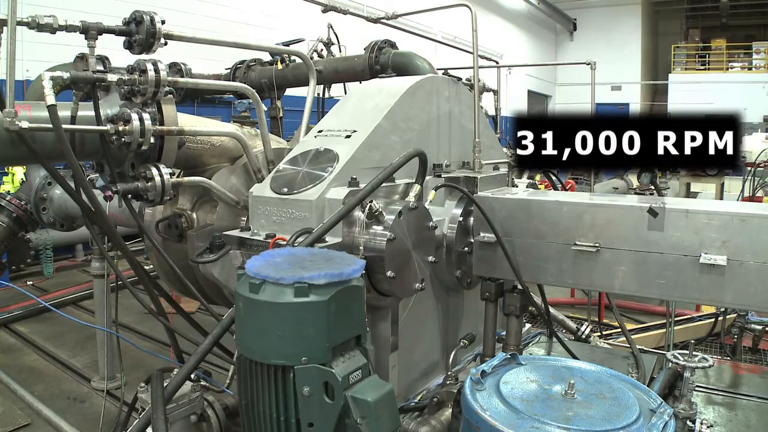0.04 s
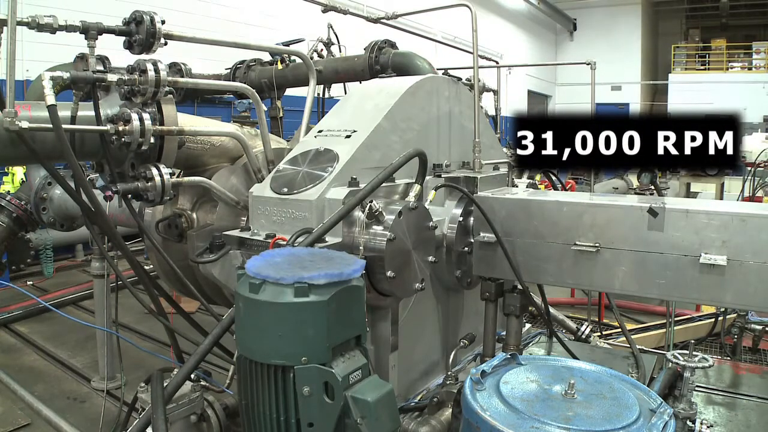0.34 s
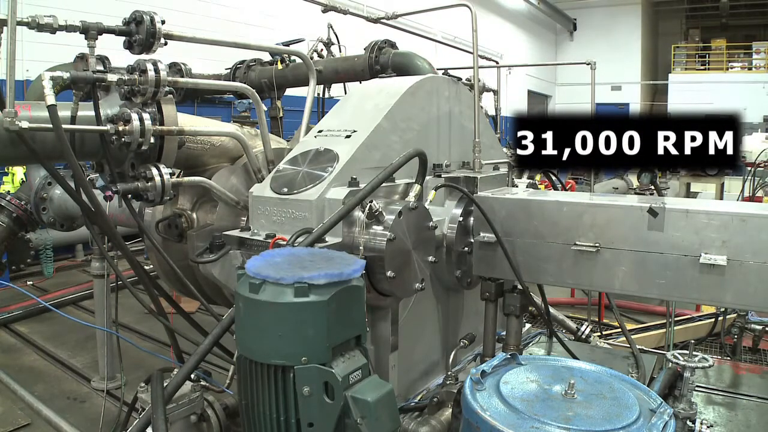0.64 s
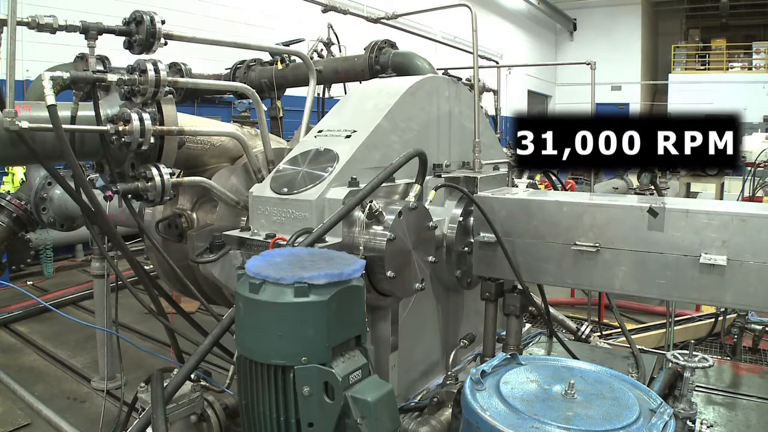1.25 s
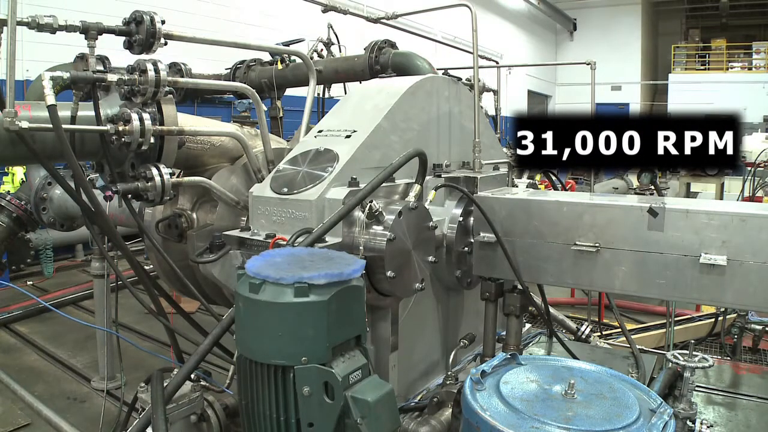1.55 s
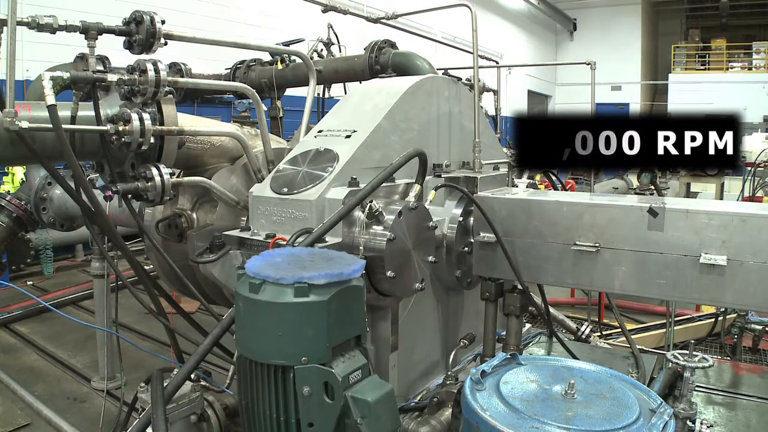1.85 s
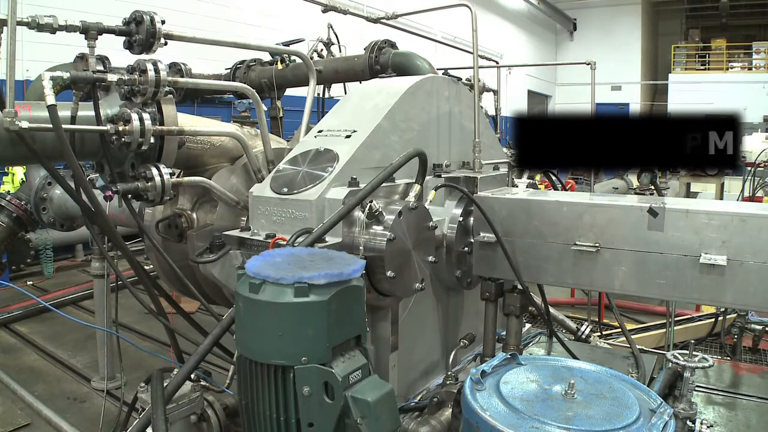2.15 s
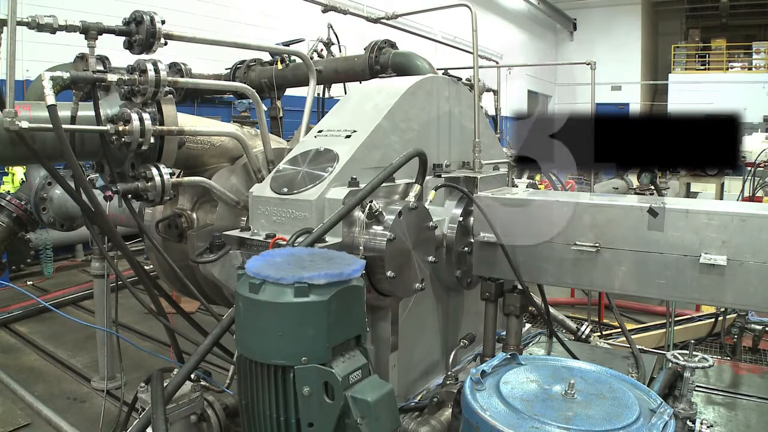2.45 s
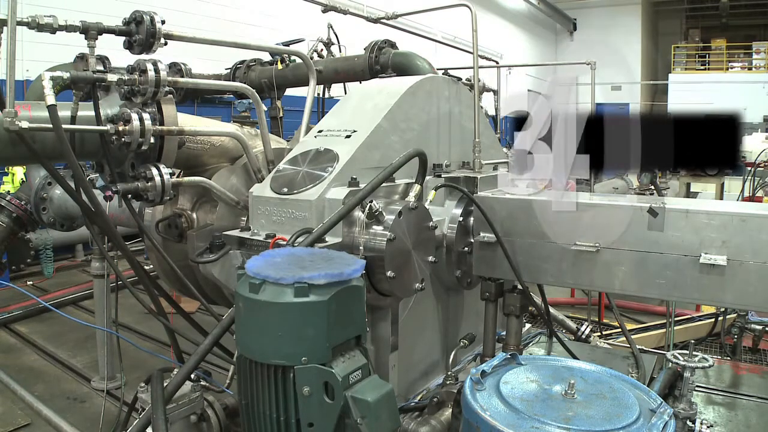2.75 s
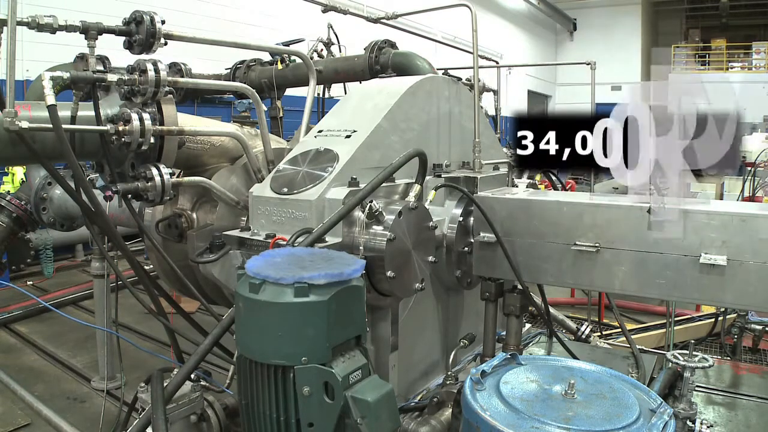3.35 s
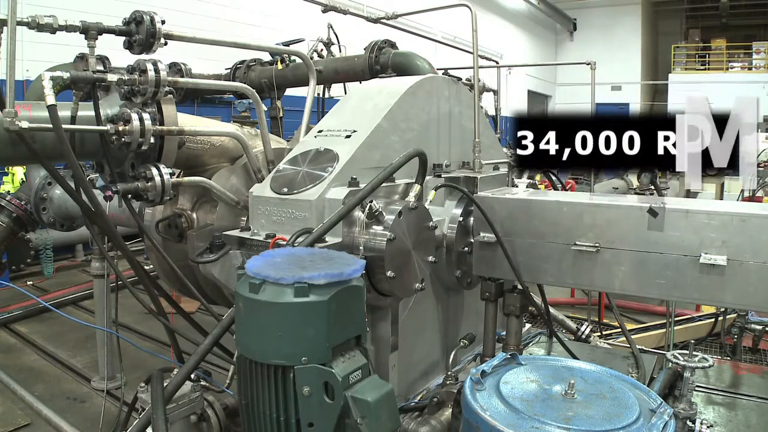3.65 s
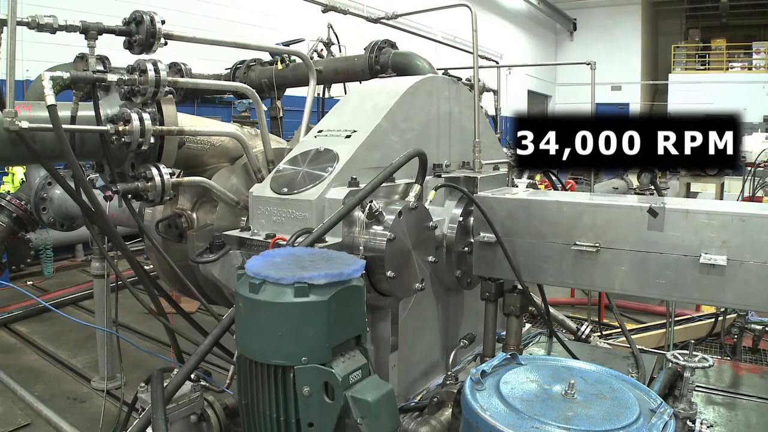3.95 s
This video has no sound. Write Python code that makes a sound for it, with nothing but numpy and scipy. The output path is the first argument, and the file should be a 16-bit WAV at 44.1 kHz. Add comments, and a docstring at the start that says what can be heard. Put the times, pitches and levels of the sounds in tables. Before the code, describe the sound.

A large industrial compressor runs in a plant hall for the whole four seconds, with a strong low hum, a rumble and a dense roar of gas. Several whining gear tones waver above it, under a faint hiss. A high fluttering whine swells around 1.7 seconds, again near 3.4 and at the end. A very faint, thin whistle comes and goes at about 1.5 seconds.

```python
"""A low hum and a roar of gas come first, with whining tones above: a large geared turbo compressor
runs in a plant hall, creeping up in speed. Its drive hums, its shafts and meshing gear teeth sing,
and two close high tones beat against each other. Gas rushes through casing and pipes over a low
rumble, and a faint hiss wavers on top. About 1.5 seconds in, a thin whistle briefly appears."""
import sys
import numpy as np
from scipy import signal
from scipy.fft import rfft, irfft
from scipy.io import wavfile
from scipy.ndimage import uniform_filter1d

SR = 44100
rng = np.random.default_rng(int(sys.argv[2]) if len(sys.argv) > 2 else 0)


def persist_wave(psi):
    """Save psi, clipped to +-1, as 16-bit WAV."""
    counts = np.round(np.clip(psi, -1, 1) * 32767).astype(np.int16)
    wavfile.write(sys.argv[1], SR, np.atleast_2d(counts).T)


N = 176400  # 4 seconds


def gain(db):
    """Turn decibels into a number to multiply a sound by."""
    return 10 ** (np.asarray(db) / 20)


def unit_strength(x):
    """Scale a signal so that its typical size (rms) is 1."""
    return x / np.sqrt(np.mean(abs(x) ** 2) + 1e-20)


def over_time(points):
    """Join a table's points with straight lines, one value per sample."""
    return np.interp(np.arange(N) / SR, *np.transpose(points))


def over_pitch(points, hz):
    """Join a table's points with straight lines along a musical (log) pitch scale."""
    table_hz, level = np.transpose(points)
    return np.interp(np.log(hz + 1), np.log(table_hz + 1), level)


def drift(rate_hz):
    """A random wander of typical size 1, mostly slower than rate_hz."""
    hz = np.fft.rfftfreq(N, 1 / SR)
    spectrum = rfft(rng.standard_normal(N)) * (hz > 0)
    return unit_strength(irfft(spectrum / (1 + (hz / rate_hz) ** 4), N))


def patches(shape, frames, bins):
    """Random blotches of typical size 1, smoothed over time (frames) and pitch (bins)."""
    smooth_in_time = uniform_filter1d(rng.standard_normal(shape), frames, axis=1)
    return unit_strength(uniform_filter1d(smooth_in_time, bins, axis=0))


# How fast the shaft turns (time [s], speed above average [%])
SHAFT_SPEED = [(0, -.3), (1, -.17), (2, .05), (3.2, .1), (4, .24)]

def tone(hz, level_db, shake, shake_hz=7, geared=True):
    """One machine tone, shaken by swirling gas; a geared tone rises with the shaft speed."""
    speed = 1 + over_time(SHAFT_SPEED) / 100 * geared
    cycles = np.cumsum(hz * speed) / SR + rng.random()
    wobble = (drift(shake_hz) + 1j * drift(shake_hz)) / np.sqrt(2)  # shakes both level and pitch
    wave = np.exp(2j * np.pi * cycles) * (1 + shake * wobble) / np.sqrt(1 + shake ** 2)
    return np.sqrt(2) * gain(level_db) * wave.real


# How loud the hum is (time [s], level [dB])
HUM_LEVEL = [(0, -21.5), (.8, -19), (1.4, -18.5), (2.4, -16.8), (3, -17.5), (4, -16.5)]

def drive_hum():
    """The drive hums with one strong, low tone."""
    return tone(hz=159.9, level_db=over_time(HUM_LEVEL), shake=.13)


# The gas noise from low to high (pitch [Hz], base level [dB per Hz])
GAS_SPECTRUM = [(12,-66),(22,-56),(35,-42.5),(60,-41.5),(110,-44),(135,-47.5),(185,-49.5),(215,-53.5),(330,-51.5),(440,-54.5),(690,-55),(745,-59),(850,-56),(1000,-61),(1110,-55.5),(1220,-61.5),(1500,-60.5),(1630,-53),(1740,-60),(1860,-62.5),(2150,-61.5),(2650,-58),(2900,-65.5),(3050,-61.5),(3170,-71.5),(3300,-66),(3480,-66),(3700,-72.5),(4200,-77.5),(4400,-89),(4650,-94),(4850,-112)]
# How the deep rumble and the roar above it swell and sink (time [s], level change [dB])
RUMBLE_SWELL = [(0, 0), (0.3, -1), (0.55, 1), (0.85, 2), (1.1, 1), (1.33, 1), (1.6, 0), (2.1, -1),
                (2.45, -4), (2.7, 0), (3.1, 1), (3.35, 0), (3.65, 1), (3.92, 2)]
ROAR_SWELL = [(0, -1.6), (1.5, -1.5), (3.3, -1), (4, -1.4)]

def gas_roar(rumble_top_hz=117):
    """Gas swirls through casing and pipes, making an even roar over a lumpy rumble."""
    hz = np.fft.rfftfreq(N, 1 / SR)
    flow = rfft(rng.standard_normal(N)) * gain(over_pitch(GAS_SPECTRUM, hz)) * np.sqrt(SR / 2)
    low_share = 1 / (1 + (hz / rumble_top_hz) ** 6)
    rumble = irfft(flow * low_share, N) * gain(over_time(RUMBLE_SWELL) + drift(10))
    roar = irfft(flow * (1 - low_share), N) * gain(over_time(ROAR_SWELL) + .3 * drift(35))
    return rumble + roar


# How loud each clear gear tone is (time [s], level [dB])
LOW_GEAR_LEVEL = [(0, -40), (0.6, -37.5), (1.15, -31.5), (1.45, -38.5), (1.8, -38), (2.15, -37),
                  (2.4, -29.5), (3.2, -34.5), (4, -37)]
MID_GEAR_LEVEL = [(0, -34.5), (0.7, -32.5), (1.05, -32.5), (1.35, -34), (1.8, -26.5), (2.2, -33.5),
                  (2.6, -31), (3.1, -28), (3.8, -41), (4, -33)]
HIGH_GEAR_LEVEL = [(0, -62), (.8, -50), (1.25, -44.5), (1.42, -49.5), (2.25, -43.5), (2.7, -46.5),
                   (3.3, -45), (3.55, -53), (3.64, -40.5), (3.79, -42), (3.84, -56), (4, -40)]

def gear_tones():
    """Gear teeth meet so quickly that they sing, here in three clear tones."""
    low = tone(hz=1263, level_db=over_time(LOW_GEAR_LEVEL), shake=.11)
    mid = tone(hz=1621.3, level_db=over_time(MID_GEAR_LEVEL), shake=.2)
    high = tone(hz=3911, level_db=over_time(HIGH_GEAR_LEVEL), shake=.33)
    return low + mid + high


# How loud each clear shaft tone is (time [s], level [dB])
LOW_SHAFT_LEVEL = [(0, -39), (.9, -38), (1.2, -35.5), (1.5, -32.5), (1.73, -38.5), (2.35, -33),
                   (2.6, -38.5), (3.55, -31.5), (4, -37)]
HIGH_SHAFT_LEVEL = [(0, -39), (.95, -35), (1.5, -42), (1.8, -35.5), (2.4, -33.5), (3.2, -35), (3.8, -33),
                    (4, -34)]

def shaft_tones():
    """The spinning shafts add two clear tones."""
    low = tone(hz=707.3, level_db=over_time(LOW_SHAFT_LEVEL), shake=.3)
    high = tone(hz=1143.3, level_db=over_time(HIGH_SHAFT_LEVEL), shake=.25)
    return low + high


# Quieter shaft and gear tones (pitch at average speed [Hz], base level halfway [dB], rise [dB per s])
WEAK_TONES = [(107.3, -30.1, -0.4), (190, -35.3, 0.5), (240, -42.4, 0.9), (319.8, -36.2, -2.7),
              (357, -38.3, 0.2), (506.7, -43.4, 0.5), (530.6, -40.5, 0.1), (599.3, -42.5, 0.4),
              (666.3, -42.5, 1.1), (861, -47.4, -0.4), (962, -44.8, 2.1), (1331, -47.2, 1.2),
              (1389, -47.2, -0.5), (1441.5, -44.4, 2.0), (1470, -47.4, -3.3), (1503, -46.6, 0.3),
              (1568, -43.4, -1.5), (1643, -40.0, 1.4), (1659, -42.4, -0.2), (1775, -46.9, -0.1),
              (2085, -49.4, 2.2), (2655, -47.2, 0.8), (3109, -52.3, -1.9), (3269, -49.8, 0.5),
              (3655, -57.1, -6.2)]

def weak_tones(boost_db=.5, fade_db=2):
    """Shafts and gears also make many weaker tones, each fading in and out at random."""
    from_middle_s = (np.arange(N) - N / 2) / SR
    out = np.zeros(N)
    for hz, base_db, rise in WEAK_TONES:
        level_db = base_db + boost_db + rise * from_middle_s + fade_db * drift(1.4)
        out += tone(hz, level_db, shake=.3)
    return out


# How loud the whine's main tone is (time [s], level [dB])
WHINE_LEVEL = [(0, -29), (.08, -43.5), (.5, -39.5), (1.17, -44), (1.42, -38.5), (1.56, -31.5), (1.72, -29),
               (1.9, -37), (2.15, -41.5), (2.4, -37), (2.68, -40.5), (3, -33.5), (3.2, -33.5), (3.25, -29),
               (3.44, -27.5), (3.48, -31), (3.64, -41.5), (3.8, -31.5), (4, -30)]

def beating_whine():
    """Two close tones swell together and slip in and out of step, so they flutter (beat)."""
    level_db = over_time(WHINE_LEVEL)
    main = tone(hz=3022, level_db=level_db, shake=.12, geared=False)
    partner = tone(hz=3048, level_db=level_db - 4.5, shake=.45, geared=False)
    return main + partner


# The hiss from low to high (pitch [Hz], base level [dB per Hz])
HISS_SPECTRUM = [(4900, -112), (5300, -104), (5700, -105), (5950, -85.5), (6450, -80.5), (6650, -90),
                 (7020, -86), (7450, -100), (8150, -101), (8650, -95.5), (9300, -99.5), (10050, -99),
                 (10400, -87), (10900, -90.5), (11550, -104), (15600, -104)]
# Three pitch bands within the hiss (bottom [Hz], top [Hz])
HISS_BAND_EDGES = [(5700, 6680), (6680, 7400), (10000, 11400)]
# How each band swells and sinks (time [s], level change [dB])
LOW_HISS_SWELL = [(0, -2), (0.2, 0), (0.35, -5), (0.55, -1), (0.7, -1.5), (0.85, 0), (1, -6.5), (1.25, -4),
                  (1.4, -0.5), (1.6, 1), (2.05, 0), (2.45, -3), (2.62, 1.5), (2.95, 1), (3.15, -2),
                  (3.4, -3), (3.55, -4), (3.7, 0.5), (4, 1.5)]
MID_HISS_SWELL = [(0, -1), (0.1, 1), (0.35, -3), (0.65, -7), (0.85, 2), (1, -3), (1.15, 0), (1.65, -5),
                  (1.8, -7), (1.92, 5.5), (2.4, 3), (2.6, -3), (2.75, -2), (3.1, -2), (3.23, 1), (3.38, -6),
                  (3.68, 2), (4, -2)]
HIGH_HISS_SWELL = [(0, 4), (0.2, 0.5), (0.35, -1), (0.55, 0.5), (0.8, 2), (0.95, -5), (1.1, 2),
                   (1.23, -1.5), (1.38, 5), (1.65, 1), (2.1, -5), (2.4, -8.5), (2.57, 0), (2.85, -7),
                   (3.2, 3), (3.35, -5), (3.55, 0.5), (4, -7)]

def hiss(waver_db=2, flicker_db=2.2):
    """Faint, high noise wavers in patches, while three bands of it swell and sink."""
    slicing = dict(nperseg=1024, noverlap=768)  # short, overlapping slices of sound
    hz, times, noise = signal.stft(rng.standard_normal(N), SR, **slicing)
    db = over_pitch(HISS_SPECTRUM, hz)[:, None] + waver_db * patches(noise.shape, frames=20, bins=9)
    db += flicker_db * patches(noise.shape, frames=12, bins=4)
    for (bottom, top), swell in zip(HISS_BAND_EDGES, (LOW_HISS_SWELL, MID_HISS_SWELL, HIGH_HISS_SWELL)):
        in_band = (hz > bottom) & (hz < top)
        db += np.outer(in_band, np.interp(times, *np.transpose(swell)))
    highs_only = (hz > HISS_SPECTRUM[0][0])[:, None]
    _, sound = signal.istft(noise * gain(db) * highs_only, **slicing)
    return np.sqrt(SR / 2) * sound[:N]


# How loud the whistle is (time [s], level [dB])
WHISTLE_LEVEL = [(1.45, -110), (1.52, -65), (1.75, -72), (1.95, -86), (2.1, -110)]

def whistle():
    """A thin, faint tone comes and goes once."""
    return tone(hz=7810, level_db=over_time(WHISTLE_LEVEL), shake=.5, shake_hz=20, geared=False)


def scene():
    """The whole machine, the same in the left and right channels."""
    tones = drive_hum() + gear_tones() + shaft_tones() + weak_tones() + beating_whine() + whistle()
    return np.tile(tones + gas_roar() + hiss(), (2, 1))


def record(dry, echo_s=.01, echo_db=-8.5, top_hz=15780):
    """The recorder widens the sound with a short echo, then cuts off the very highest pitches."""
    echo = dry[0]
    for hz, kind in [(105, "high"), (10500, "low")] * 2:  # soften the echo's lows and highs
        echo = signal.lfilter(*signal.butter(1, hz, kind, fs=SR), echo)
    echo = gain(echo_db) * np.pad(echo, (round(echo_s * SR), 0))[:N]
    wide = dry + np.array([echo, -echo])  # added on the left, subtracted on the right
    treble_cut = signal.firwin(1023, top_hz, window=("kaiser", 9), fs=SR)
    return signal.oaconvolve(wide, treble_cut[None], "same")


dry = scene()
out = record(dry)
persist_wave(out)
```